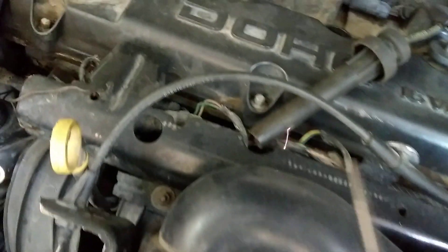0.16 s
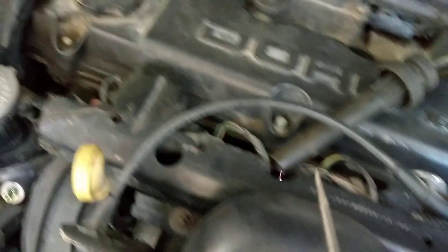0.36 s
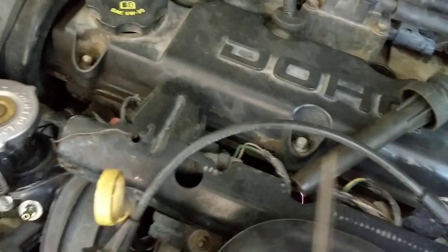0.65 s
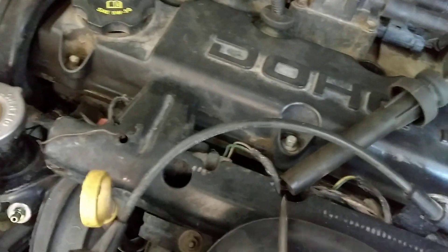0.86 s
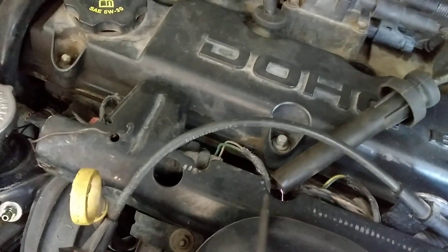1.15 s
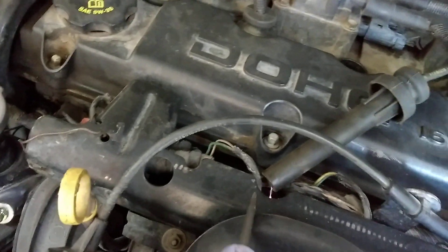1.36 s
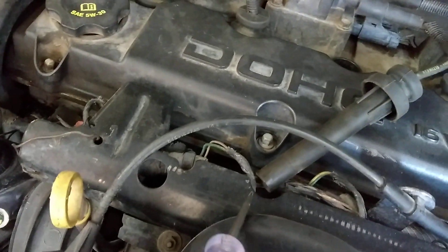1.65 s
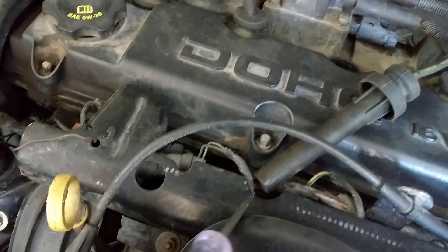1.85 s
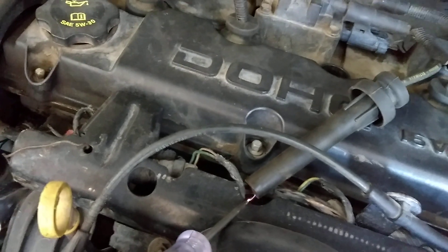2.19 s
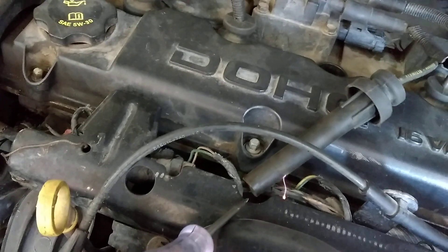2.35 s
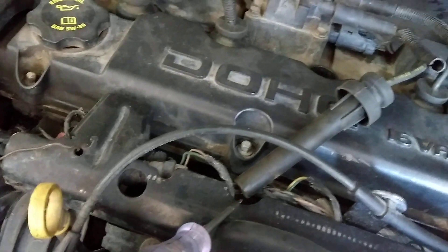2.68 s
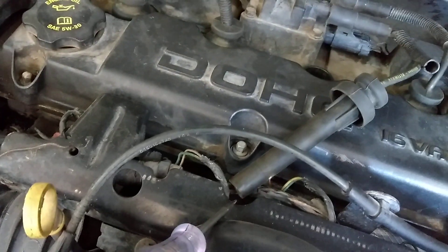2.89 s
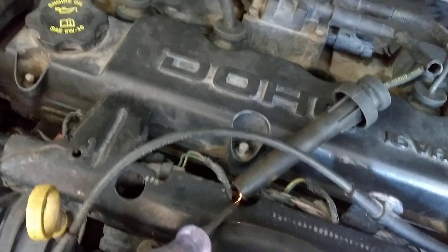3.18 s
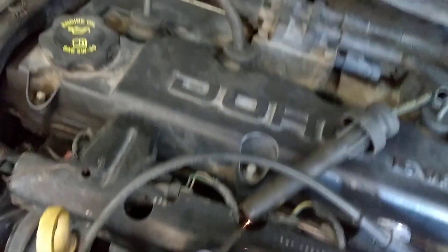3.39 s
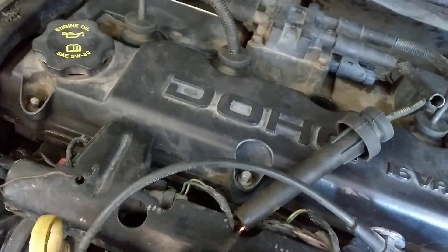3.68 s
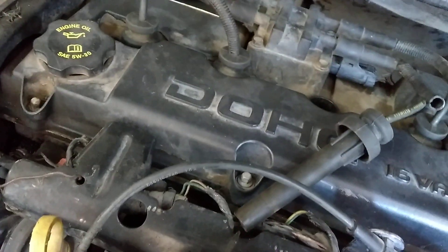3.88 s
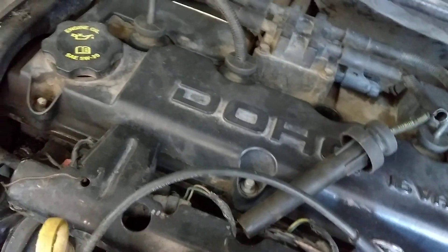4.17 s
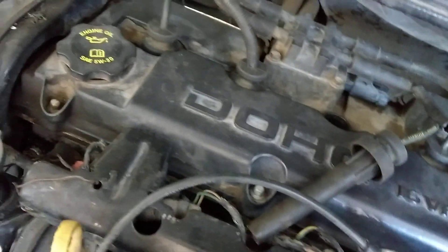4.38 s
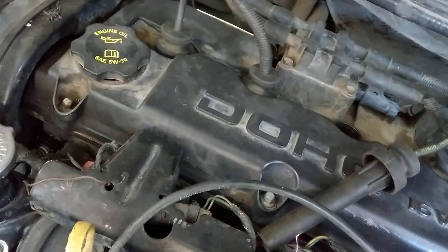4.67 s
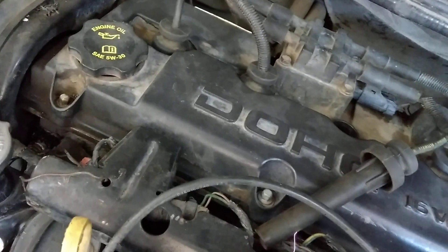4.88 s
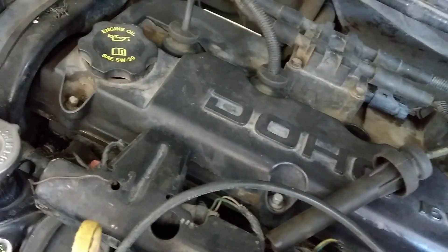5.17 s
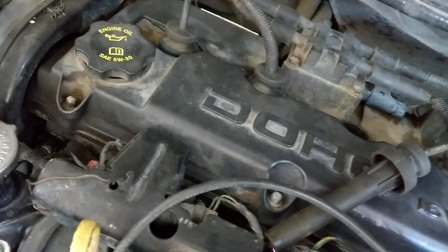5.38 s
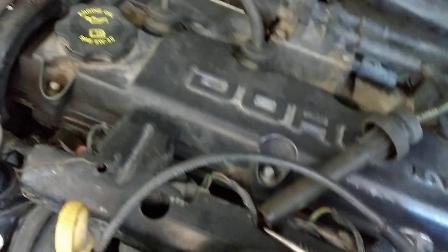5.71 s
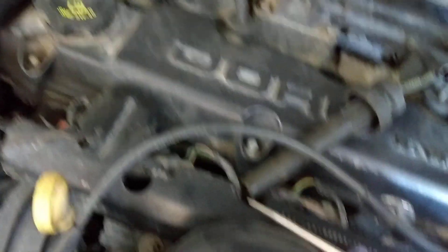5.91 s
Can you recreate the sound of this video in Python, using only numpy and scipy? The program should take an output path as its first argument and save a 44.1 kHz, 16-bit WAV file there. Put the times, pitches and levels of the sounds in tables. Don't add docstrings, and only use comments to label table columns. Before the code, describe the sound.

Under an open bonnet, a four-cylinder engine idles unevenly with one cylinder dead. Casting noise, ticking valves, a hollow intake hum and soft exhaust pulses run throughout. About thirteen sparks a second snap in a hollow rubber boot, while brighter arcs jump out irregularly. Strong arcs hit the left microphone as blunt pops, after which the level dips and recovers. Close, thin-bassed, wide stereo.

```python
import sys
import numpy as np
from scipy import signal
from scipy.io import wavfile
from scipy.ndimage import uniform_filter1d, minimum_filter1d

SR = 44100
rng = np.random.default_rng(int(sys.argv[2]) if len(sys.argv) > 2 else 0)


def voltage_ratio(decibels):
    exponent = np.asarray(decibels, float) / 20
    return 10 ** exponent


def digitize_waveform(pressure):
    field = np.atleast_2d(pressure).T
    bounded = np.clip(field, -1, 1)
    quanta = np.round(bounded * 32767).astype(np.int16)
    wavfile.write(sys.argv[1], SR, quanta)


N = 266628

# time_s, level_db
ENGINE_LEVEL = [(0, 0), (1.1, .5), (1.5, -0.1), (1.9, 1.5), (2.4, 0), (3.4, 1.84), (3.8, 2), (4.3, 2),
                (5, -1.2), (5.5, 1), (6.05, -0.5)]
# freq_hz, density_db_per_hz
BLOCK_SPECTRUM = [(30, 26), (60, -4.5), (130, 4.5), (480, -3.5), (1000, 2), (1950, 3), (2350, -7.5),
                  (3000, -8), (5200, -3.5), (7200, -11.5), (8000, -21), (9000, -21.5), (12800, -30),
                  (14300, -32)]
# freq_hz, level_re_left_db
RIGHT_TILT = [(60, -1), (200, -1.1), (500, -18.5), (2000, -5.5), (2700, 5.5), (4000, -3.5), (7000, -5.5),
              (8500, 7.5), (12000, 12.5)]
# freq_hz, correlation
MIC_LIKENESS = [(100, 0.92), (300, 1), (600, 0.4), (1200, 0.15), (1800, -0.57), (2450, 0.15), (3200, 0.085),
                (4200, -0.079), (5100, 0.68), (6400, -1.35), (7900, 1), (9000, -1.85), (10200, 1),
                (11500, -0.016)]
# freq_hz, level_db, t60_s
BOOT_MODES = [(3954, 1, 0.016), (3650, -9.5, 0.012), (4040, -11.5, 0.005), (1397, -3, 0.0078),
              (6220, -4.5, 0.0052), (7470, -8, 0.013)]
# freq_hz, level_db, t60_s
VALVE_MODES = [(6473, 6, 0.015), (7300, 2, 0.0038), (1974, -5.5, 0.11), (3190, -2.5, 0.024),
               (1316, 0.5, 0.031), (836, 0.5, 0.037)]
CYLINDER_BLOWS = [
    -9,
    0,
    -9,
    -18,
]
# freq_hz, gap_db
STEREO_GAP = [(1800, 10.5), (2500, 5), (3300, 9), (6600, 9), (7600, 2), (10300, 3.5), (11000, 8),
              (14000, 8.5)]
# time_s, lag_ms
CRANK_LAG = [(0, -.5), (.32, -1.5), (.7, -3.1), (1.5, -3.2), (2.05, -2.7), (2.5, -1.4), (2.9, -1.2),
             (3.2, .4), (3.8, .9), (4.3, 0), (4.6, .8), (5, 2.5), (5.55, 2.9), (6, .2)]
# time_s, ring_peak_db
SPARK_GAP = [(0, -14), (.4, -15), (.55, -12), (1.2, -14), (1.7, -17.5), (2.05, -15), (2.35, -15.5),
             (2.8, -17.5), (3.2, -17.5), (3.42, -14.5), (3.75, -16.5), (4.1, -18.5), (4.4, -14.5),
             (5.2, -17.5), (5.45, -14), (6, -19.5)]
# time_s, crack_peak_db, left_mic_voltage_step, gain_after_db
OPEN_ARCS = [(0.0968, -22, -0.45, -3), (0.2466, -22, .01, 0), (.8472, -22, .29, 0), (0.9983, -19.5, .28, 1),
             (1.5251, -20, 0.42, 0), (1.6, -20.5, .023, 0), (1.7506, -18, .01, 0), (1.827, -17, -.65, -6.5),
             (2.1284, -25, 1.12, -12.5), (2.4304, -20, -.21, -6), (2.5053, -20, -.22, -1),
             (2.582, -22.5, -0.3, -2), (2.656, -21.5, .02, -3), (2.731, -18.5, -0.53, -3.5),
             (2.957, -21.5, 0.12, 0), (3.5612, -18, .11, 0), (3.6373, -23.5, 0.81, -5.5),
             (3.8624, -21.5, -.34, -4.5), (4.2385, -22.5, 0.92, -8.5), (4.3132, -16, -0.75, -9),
             (4.5398, -17.5, 0.064, -3), (4.7664, -19.5, -0.43, -2), (4.843, -25, 0.2, -1.5),
             (4.9937, -25, 0.9, -5.5), (5.0684, -21, -0.73, -6), (5.2951, -23, 1.18, -12.5),
             (5.5201, -16.5, -0.6, -7), (5.7448, -20, 0.16, -3.5), (5.821, -23, 0.14, 10),
             (5.8954, -21.5, -0.62, 0)]
# time_s, level_db
AIR_DRAW = [(0, -1.5), (.3, 0.5), (.7, -4.5), (1.5, -0.5), (2.1, -4), (3.1, -1.1), (3.5, 2.5), (3.9, -1),
            (5, -3.2), (5.7, -1), (6.05, -4)]
# freq_hz, level_db, t60_s
SNAP_MODES = [(5190, -9, 0.0033), (3860, -20, 0.0036), (10260, -16, 0.0005)]

BLOCK_DB, VALVE_DB, HUM_DB, BLOW_DB = -33.5, -43, -39.5, -39
HUM_HZ, HUM_WIDTH_HZ, BLOW_HZ = 566.4, 137, 44
FIRST_S, TURN_S, LOPE_MS = .0228, .075271, .45
BOOT_CRACK_DB, RING_SPREAD_DB, CRACK_SPREAD_DB = -24.5, 1.2, 2.5
OPEN_RING_DB, RING_LOSS_DB_PER_STEP = -23, -12
FRONT_DECAY_S, FRONT_DB, OPEN_FRONT_DB = .0012, -26, 9
SNAP_OVER_CRACK_DB, CRACK_DECAY_S, RING_CREST = 12, .0021, 6
BUILD_S, BURN_S, FLUTTER_DB = .0007, .0042, 1.5
RECOVER_DB_PER_S, TOP_HZ = 19.5, 13840
LOW_CUT_HZ, CROSS_DELAY_SAMPLES = 90, 17
CROSS_FEED, BASS_FEED, BASS_FEED_HZ = .55, .32, 900
GATE_FROM_HZ, SUDDEN_DB = 900, 11
FICKLE_DB, FICKLE_FROM_HZ = 2.5, 7000


def evened(x):
    return x / np.sqrt(np.mean(x ** 2) + 1e-20)


def read(points, hz):
    f_hz, value = np.transpose(points)
    return np.interp(np.log(hz + 1), np.log(f_hz + 1), value)


def follow(curve, s=None):
    return np.interp(np.arange(N) / SR if s is None else s, *np.transpose(curve))


def train(s, size):
    out = np.zeros(N)
    at = np.round(np.asarray(s) * SR).astype(int)
    out[np.clip(at, 0, N - 1)] = size
    return out


def ring(hz, db, t60_s):
    t = np.arange(2048) / SR
    return voltage_ratio(db - 60 * t / t60_s) * np.sin(2 * np.pi * hz * t)


def crank():
    return (np.arange(N) / SR - FIRST_S - follow(CRANK_LAG) / 1000) / TURN_S


def muffled(x):
    return signal.sosfilt(signal.ellip(8, 1, 60, TOP_HZ, fs=SR, output="sos"), x)


def block(patchy_db=2.5, throb_db=0.18):
    frames, hz = N // 128 + 5, np.fft.rfftfreq(512, 1 / SR)
    a, b, c, d, patches = rng.standard_normal((frames, 257, 5)).T
    patches = uniform_filter1d(patches, size=6, axis=0)
    patches = evened(uniform_filter1d(patches, size=8, axis=1))
    alike = np.clip(read(MIC_LIKENESS, hz), -1, 1)[:, None]
    left = a + 1j * b
    right = alike * left + np.sqrt(1 - alike ** 2) * (c + 1j * d)
    right = right * voltage_ratio(read(RIGHT_TILT, hz))[:, None]
    level = voltage_ratio(read(BLOCK_SPECTRUM, hz)[:, None] + patchy_db * patches)
    z = np.array([left, right]) * level * (hz > 0)[:, None]
    noise = signal.istft(z, nperseg=512, noverlap=384)[1][:, :N]
    throb = voltage_ratio(throb_db * np.cos(4 * np.pi * (crank() - .1)))
    return voltage_ratio(BLOCK_DB + follow(ENGINE_LEVEL)) * throb * noise / np.std(np.diff(noise[0])) * 0.43


def valves(per_s=900, spread_db=2.0, bunch_db=0.5):
    uneven_db = spread_db * np.minimum(rng.exponential(1, N), 3)
    cam_db = bunch_db * np.cos(4 * np.pi * (crank() - .15))
    size = voltage_ratio(uneven_db + cam_db) * (rng.random(N) < per_s / SR)
    count = len(VALVE_MODES)
    part, out = rng.integers(0, 2 * count, N), np.zeros((2, N))
    for k, mode in enumerate(VALVE_MODES + VALVE_MODES):
        out[k // count] += signal.oaconvolve(size * (part == k), ring(*mode))[:N]
    return voltage_ratio(VALVE_DB + follow(ENGINE_LEVEL)) * evened(out) * voltage_ratio([[1.5], [-1.5]])


def intake(apart=0.42):
    a, b, drift = rng.standard_normal((3, N))
    drift = uniform_filter1d(uniform_filter1d(drift, size=1500), size=1500)
    hz = HUM_HZ * (1 + .03 * evened(drift))
    turn = np.exp(2j * np.pi * np.cumsum(hz) / SR)
    r = np.exp(-np.pi * HUM_WIDTH_HZ / SR)
    air = np.array([a, 0.38 * (a + apart * b)])
    slow = signal.lfilter([1], np.convolve([1, -r], [1, -r]), air / turn)
    return voltage_ratio(HUM_DB + follow(AIR_DRAW)) * evened((turn * slow).real)


def exhaust():
    firing = np.floor(2 * crank() + 0.306).astype(int)
    fires = np.diff(firing)
    at_s = np.flatnonzero(fires) / SR
    cylinder = firing[1:][fires > 0] % 4
    size = voltage_ratio(np.array(CYLINDER_BLOWS)[cylinder] + 1.2 * rng.standard_normal(len(at_s)))
    blow = ring(BLOW_HZ, 0, 0.48) + ring(130, -11.5, 0.18) + ring(222, -19.5, 0.29)
    blows = signal.oaconvolve(train(at_s, size), blow)[:N]
    return voltage_ratio(BLOW_DB) * evened(blows) * voltage_ratio([[0], [-2.5]])


def firing_order():
    turn = np.arange(int((N / SR - FIRST_S) / TURN_S) + 1)
    s = FIRST_S + TURN_S * turn
    s = s + (follow(CRANK_LAG, s) + LOPE_MS * (-1.) ** turn) / 1000
    ring_luck, crack_luck = rng.standard_normal((len(s), 2)).T
    ring_db = follow(SPARK_GAP, s) + RING_SPREAD_DB * ring_luck
    crack_db = BOOT_CRACK_DB + CRACK_SPREAD_DB * crack_luck
    rows = np.array([s, ring_db, crack_db, 0 * s]).T
    for at_s, arc_db, step, _ in OPEN_ARCS:
        rows[abs(s - at_s).argmin()] = at_s, OPEN_RING_DB + RING_LOSS_DB_PER_STEP * abs(step), arc_db, 1
    return rows


def sparks(tail_db=-10, right_db=-14):
    (out, front), t = np.zeros((2, 2, N + 2048)), np.arange(1024) / SR
    bright = signal.butter(2, 3200, "high", fs=SR, output="sos")
    rows = firing_order()
    snap = sum(ring(*mode) for mode in SNAP_MODES)[:1024]
    chance = rng.standard_normal((len(rows), 3, 1024))
    for (s, ring_db, crack_db, openness), (burn, left, right) in zip(rows, chance):
        pitch = 1 + .01 * burn[0]
        boot = sum(ring(hz * pitch, db, t60_s) for hz, db, t60_s in BOOT_MODES)[:1024]
        flutter = voltage_ratio(FLUTTER_DB * evened(uniform_filter1d(burn, size=20)))
        rung = boot * flutter * (1 - np.exp(-(t + .0001) / BUILD_S)) * np.exp(-(t / BURN_S) ** 2)
        rung = voltage_ratio(ring_db) * evened(rung) / RING_CREST
        fade = np.exp(-t / CRACK_DECAY_S) + voltage_ratio(tail_db) * np.exp(-t / 0.0066)
        fade = fade * (1 - np.exp(-t / 0.00092))
        crack = voltage_ratio(crack_db - 4.0) * fade * signal.sosfilt(bright, [left, 1.69 * right])
        crack = crack + openness * voltage_ratio(crack_db + SNAP_OVER_CRACK_DB) * snap * [[1], [.45]]
        at = round(s * SR) - 8
        out[:, at:at + 1024] += crack + [rung, voltage_ratio(right_db) * np.roll(rung, shift=24)]
        front_gain = voltage_ratio(FRONT_DB + OPEN_FRONT_DB * openness)
        front[:, at:at + 1024] += front_gain * np.exp(-t / FRONT_DECAY_S) * crack
    return (muffled(out) + front)[:, :N]


def jolts():
    s, _, step, _ = np.transpose(OPEN_ARCS)
    hits = train(s, step)
    edge = signal.lfilter([1], [1, -np.exp(-5 / SR)], hits)
    edge += 0.058 * signal.lfilter([1], [1, -.85], hits)
    return np.array([uniform_filter1d(edge, size=5), np.zeros(N)])


def ducking():
    t, gain_db = np.arange(N) / SR, np.zeros(N)
    for s, _, _, after_db in OPEN_ARCS:
        ducked_db = np.minimum(gain_db, after_db + RECOVER_DB_PER_S * (t - s))
        gain_db = np.where(t > s + .003, ducked_db, gain_db)
    return voltage_ratio(uniform_filter1d(gain_db, size=150))


def scene():
    engine = muffled(block() + valves() + intake() + exhaust())
    return ducking() * (engine + sparks()) + jolts()


def stereo_gate(x):
    hz, _, z = signal.stft([x[0] + x[1], x[0] - x[1]], SR, nperseg=1024, noverlap=768)
    hz = hz[:512, None]
    power = abs(z[:, :512]) ** 2
    band = np.repeat(power.reshape(2, 64, 8, -1).sum(2), 8, axis=1)
    frames = band.shape[2]
    held = np.arange(frames) // 4 * 4
    mood = np.repeat(rng.standard_normal((frames, 32)).T, 16, axis=0)
    band = uniform_filter1d(band, size=5, axis=2)[:, :, held]
    treble = power[:, 60:].sum((0, 1))
    calm = treble < voltage_ratio(SUDDEN_DB) * minimum_filter1d(treble, size=15)
    fickle_db = FICKLE_DB * mood[:, held] * (hz > FICKLE_FROM_HZ)
    gap = voltage_ratio(2 * read(STEREO_GAP, hz) + 2 * fickle_db)
    weak = (band * gap < band[::-1]) & (hz > GATE_FROM_HZ) & calm
    z = z * np.pad(~weak, ((0, 0), (0, 1), (0, 0)))
    mid, side = signal.istft(z, SR, nperseg=1024, noverlap=768)[1][:, :N]
    return np.array([mid + side, mid - side]) / 2


def band_limit(x):
    return signal.sosfilt(signal.butter(12, 15340, fs=SR, output="sos"), x)


def record(dry):
    cut = signal.sosfilt(signal.cheby1(4, .01, LOW_CUT_HZ, "high", fs=SR, output="sos"), dry)
    cut = np.clip(cut, -1, 1)
    late = np.pad(cut[::-1], ((0, 0), (CROSS_DELAY_SAMPLES, 0)))[:, :N]
    r = np.exp(-2 * np.pi * BASS_FEED_HZ / SR)
    feed = CROSS_FEED * late + BASS_FEED * signal.lfilter([1 - r], [1, -r], late)
    mix = np.clip(stereo_gate(cut - feed), -1, 1)
    return band_limit(mix)


dry = scene()
out = record(dry)
digitize_waveform(out)
```